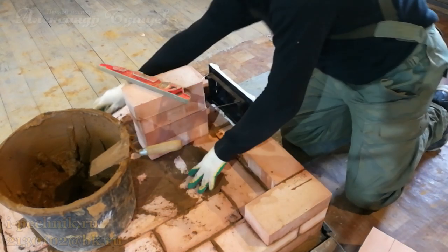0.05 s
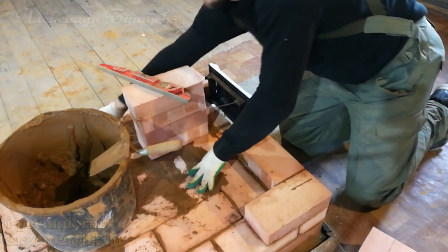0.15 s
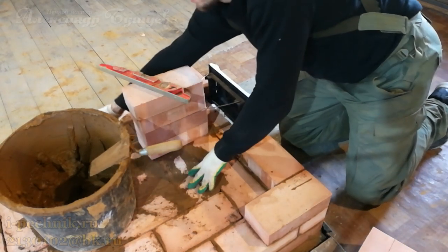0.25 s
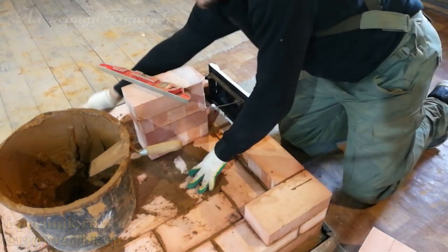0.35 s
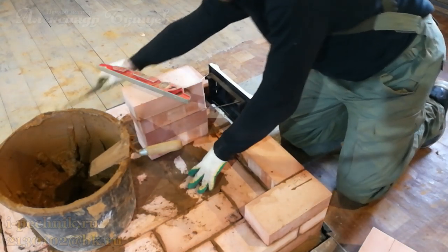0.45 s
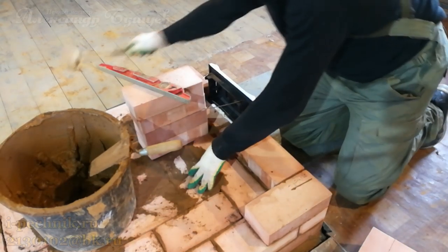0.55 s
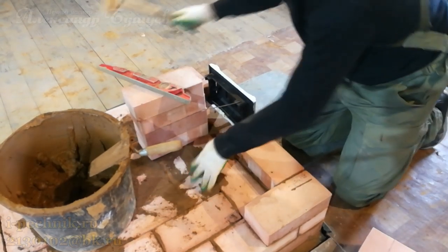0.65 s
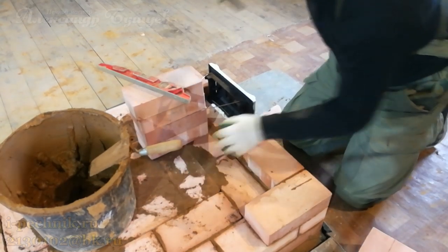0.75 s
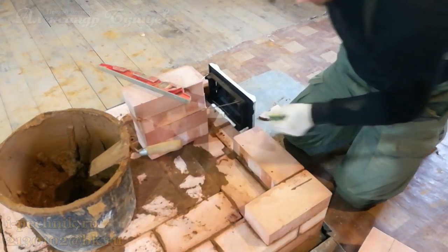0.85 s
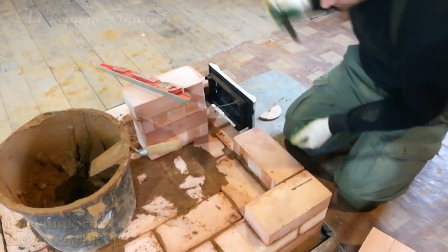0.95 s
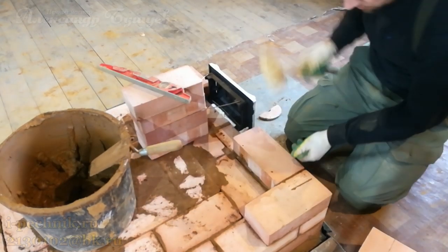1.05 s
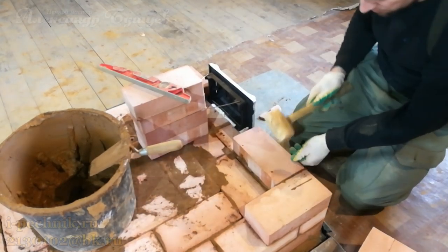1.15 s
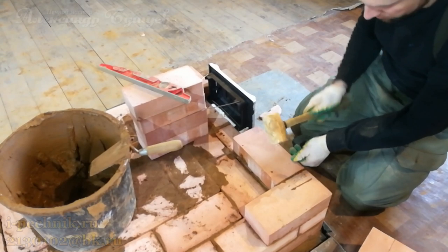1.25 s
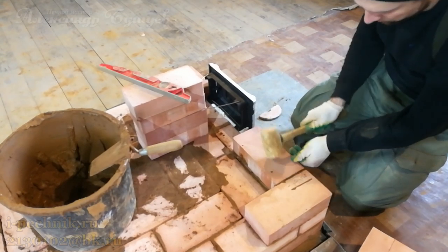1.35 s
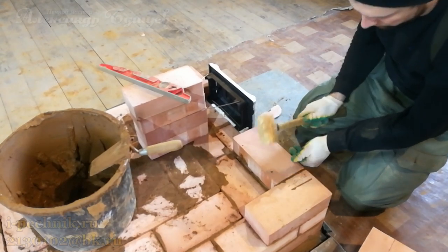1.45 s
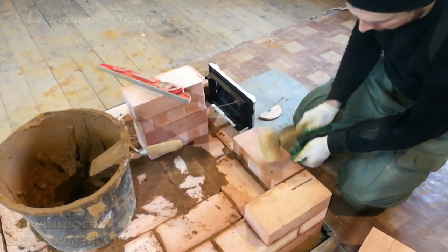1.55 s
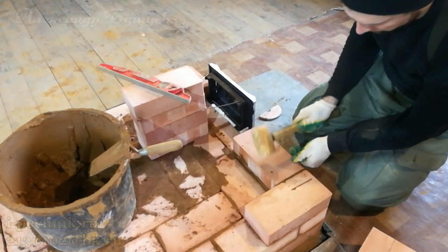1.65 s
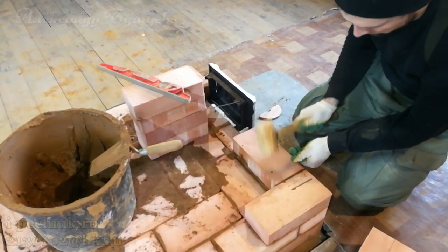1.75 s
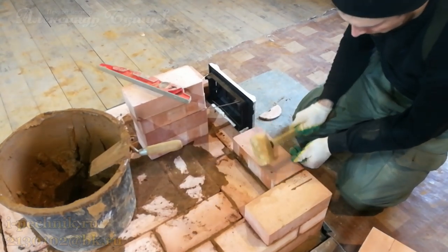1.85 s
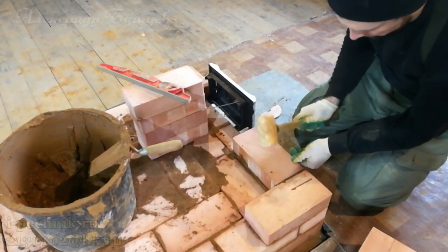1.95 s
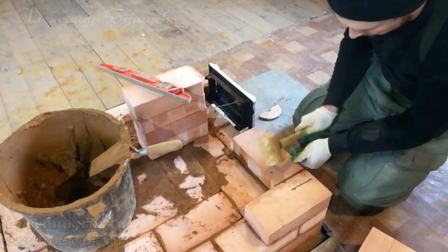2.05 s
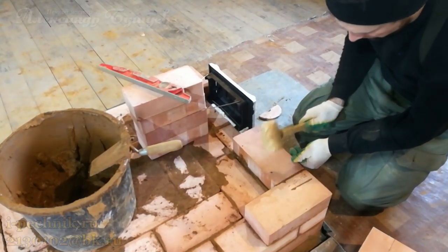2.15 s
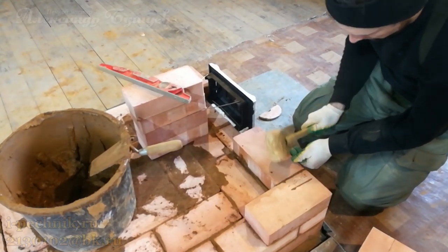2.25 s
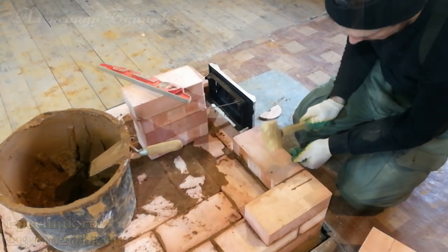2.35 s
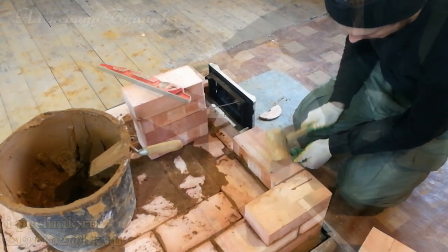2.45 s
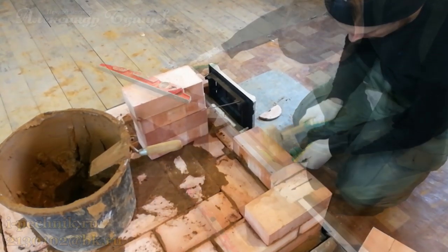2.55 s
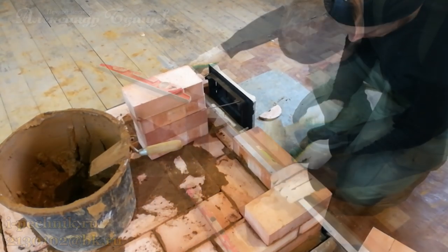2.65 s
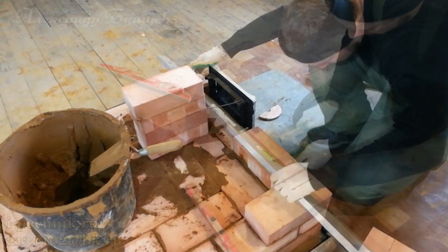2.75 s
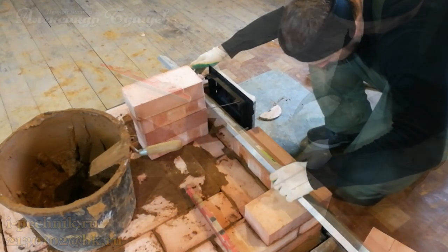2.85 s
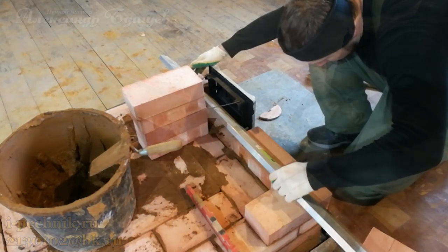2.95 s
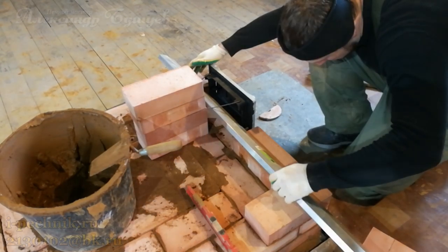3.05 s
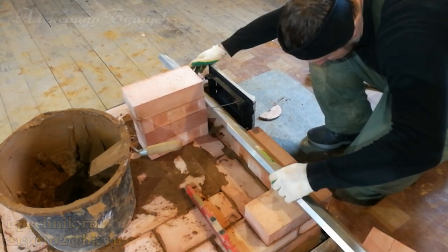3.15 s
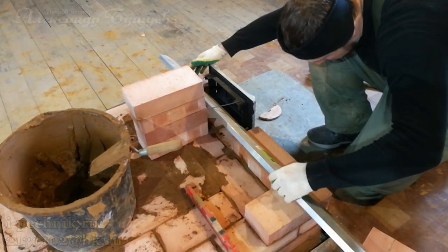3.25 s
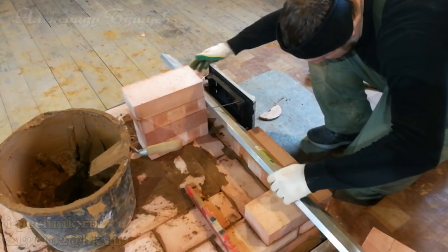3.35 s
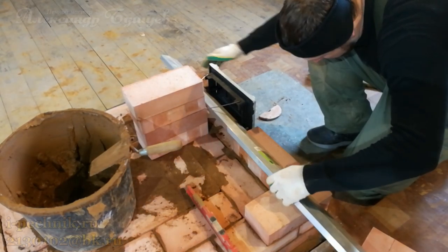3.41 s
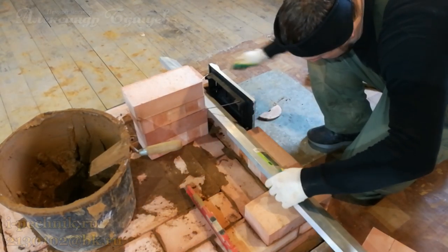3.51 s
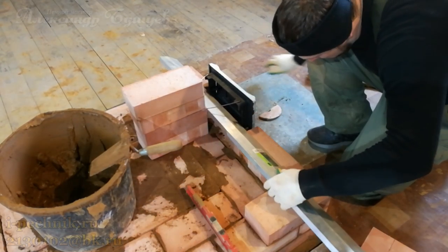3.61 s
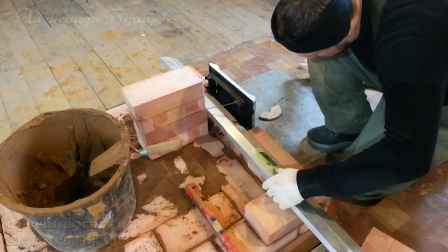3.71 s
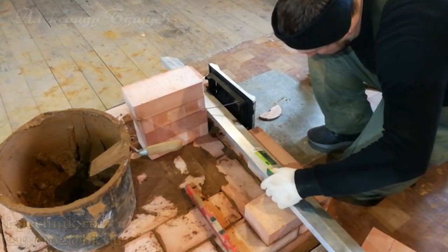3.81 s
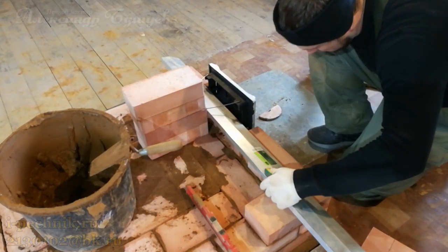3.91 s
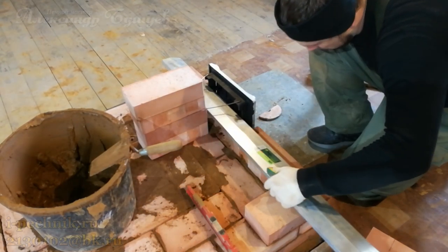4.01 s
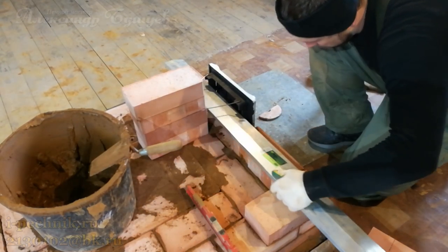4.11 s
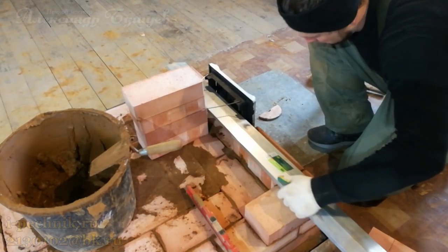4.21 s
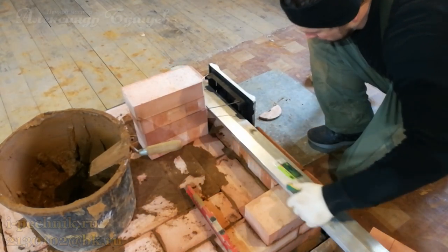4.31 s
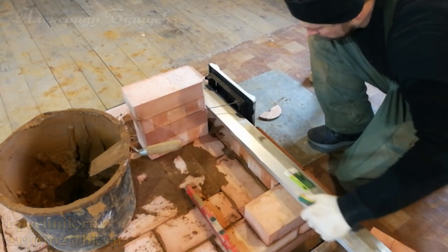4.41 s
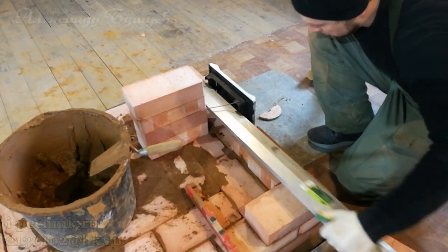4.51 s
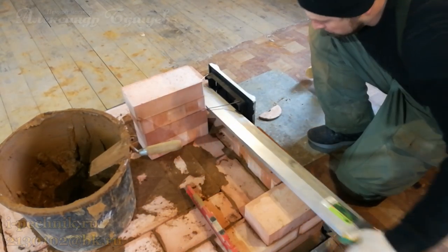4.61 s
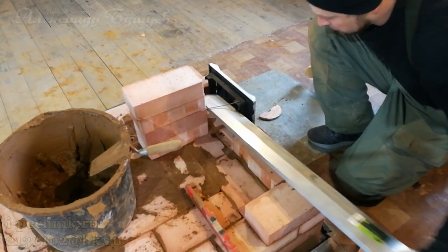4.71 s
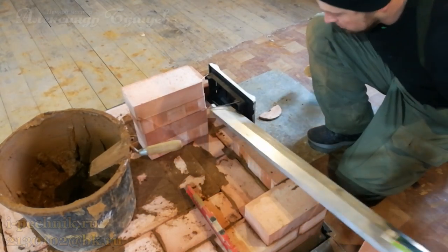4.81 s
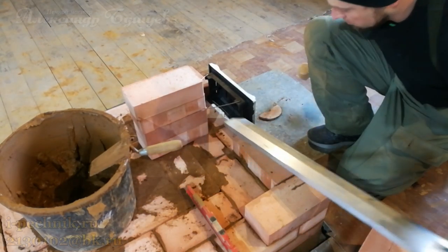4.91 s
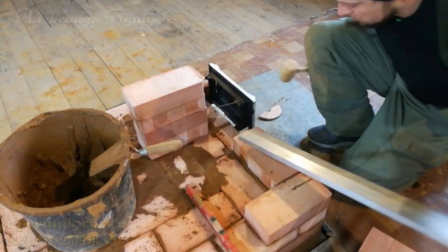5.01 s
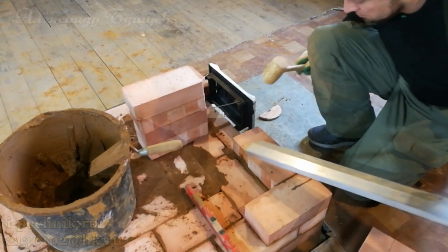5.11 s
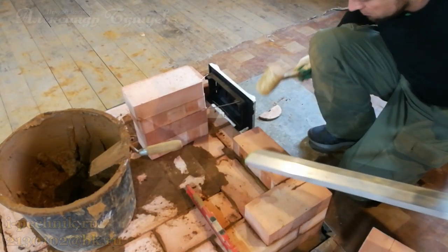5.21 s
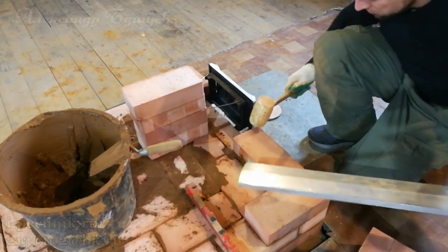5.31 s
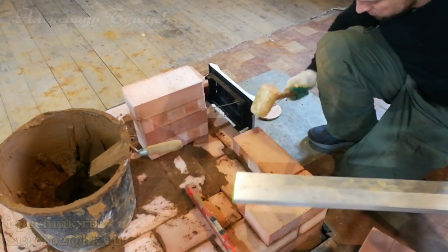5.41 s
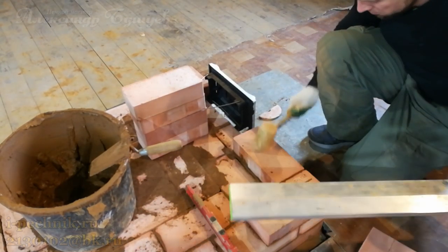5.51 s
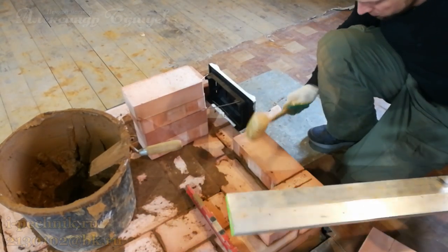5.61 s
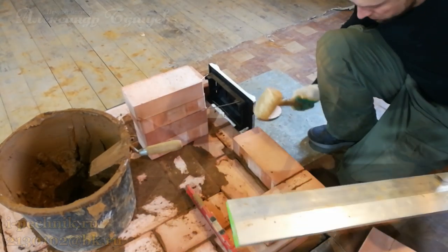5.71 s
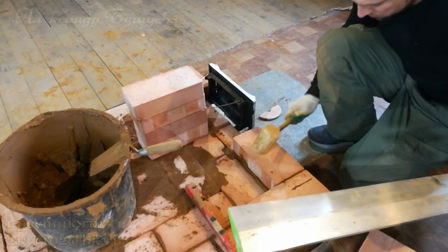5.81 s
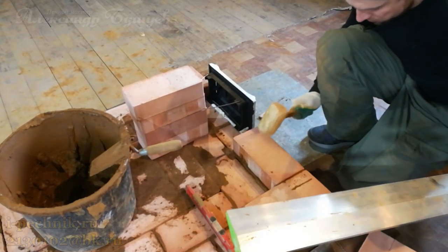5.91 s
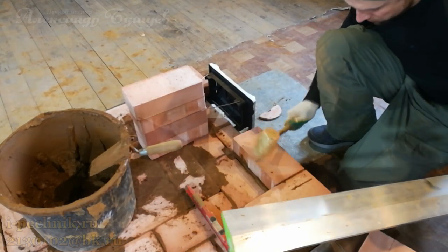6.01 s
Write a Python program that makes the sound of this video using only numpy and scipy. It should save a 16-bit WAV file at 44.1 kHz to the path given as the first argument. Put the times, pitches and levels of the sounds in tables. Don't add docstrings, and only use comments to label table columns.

```python
import sys
import numpy as np
from scipy import signal
from scipy.fft import rfft, irfft, next_fast_len
from scipy.io import wavfile
from scipy.ndimage import uniform_filter1d

SR = 44100
rng = np.random.default_rng(int(sys.argv[2]) if len(sys.argv) > 2 else 0)


def master_out(mix):
    frames = np.transpose(np.atleast_2d(mix))
    ceiling = np.clip(frames, -1, 1)
    pcm = np.round(ceiling * 32767).astype(np.int16)
    wavfile.write(sys.argv[1], SR, pcm)


def voltage_ratio(decibels):
    exponent = np.asarray(decibels, float) / 20
    return 10 ** exponent


N = 267543
TIME = np.arange(N) / SR

# mode_hz, level_db, t60_s
BAR_MODES = [(310, -5, .1), (495, -2, 0.12), (856, -2.5, 0.082), (1078, 3.5, 0.22), (1190, 0, 0.2),
             (1270, -1, 0.14), (1420, -5, 0.1), (1650, 1, 0.08), (1780, 7, 0.13), (1950, 0, 0.1),
             (2318, -8, 0.2), (2958, 4, 0.05), (3100, 2, 0.07), (3400, 1, 0.12), (3650, 0, 0.08),
             (4340, -5, 0.035), (5300, -3, 0.03)]
# freq_hz, density_db (per Hz)
GRIT_SPECTRUM = [(240, -41), (400, -13), (753, -19), (1060, -9), (1730, -1.5), (2290, -10.5), (3200, -6),
                 (4200, -10), (5300, -8), (7630, -12), (9700, -7.5), (16000, -13)]


def mallet():
    # start_s, crack_peak_db, thump_db, brightness_db
    blows = [(1.312, -38.5, -37, 10), (1.5256, -33, -34, 1), (1.7456, -31, -33.5, -8.5),
             (1.9764, -27.5, -32, 1.5), (2.2058, -33, -36, 0.5), (2.4159, -40.5, -37, 5),
             (2.6434, -37, -37.5, 4), (2.918, -44.5, -42.5, 7.5), (5.469, -22, -29.5, 8.5),
             (5.7289, -18, -30.5, -1), (5.978, -24.5, -32, 0)]
    # delay_s, level_db
    echoes = [(0, 3.5), (.007, -10.5), (0.009, -16), (0.0189, -4.5), (0.0223, -6.5), (0.03, -25.5),
              (0.03, -11), (0.04, -19.5), (.052, -16.5)]
    # mode_hz, level_db, t60_s
    board_modes = [(55.6, -10.5, 0.43), (76.8, 8, 0.16), (94.5, 1, 0.24), (107.3, 3, 0.2), (138, -1, 0.22),
                   (205.5, 5.5, 0.13), (264.6, -9, 0.13), (280, -14, 0.21), (383.5, -10, 0.14),
                   (665, -18, 0.14), (834, 0, 0.032)]
    # freq_hz, density_db (per Hz)
    crack_spectrum = [(290, -92), (500, -68), (708, -8), (960, 4), (1720, -4.5), (2290, -2.5), (4150, -9.5),
                      (4660, -9), (10800, -16), (16000, -25)]
    pulse_hz, pulse_peak_s = 270, .0028
    left_delay_s = np.array([[.00025], [0]])

    t = TIME[:SR // 2]
    thump = voltage_ratio(-4.0) * ring(board_modes, 0, 0.1, bloom=2.88)
    for delay, db in echoes:
        u = (np.pi * pulse_hz * (t - delay - pulse_peak_s - left_delay_s)) ** 2
        thump = thump + voltage_ratio(db) * (1 - 2 * u) * np.exp(-u)

    near, far, wet = np.zeros((2, N)), np.zeros(N), np.zeros(N)
    for s, crack_db, db, bright_db in blows:
        add(near, s, voltage_ratio(db + 6.5) * thump)
        add(wet, s, voltage_ratio(db - 7.5) * thump[0, :260])
        burst = crack(crack_db - 1.0, crack_spectrum, contact_s=0.0012)
        add(far, s, colour(burst, [(100, -33.5), (400, 26), (1000, -2.0), (15000, bright_db)]))
    return near, far, wet


def strikes():
    # start_s, ring_db, crunch_db, contact_s, clatter_t60_s,
    # ring_room_db (re ring_db), crunch_room_db (re crunch_db)
    knocks = [
        (3.491, -29, -18, 0.0081, 0.11, -17.5, -1),
        (4.079, -39.5, -27.5, 0.01, 0.0077, -19, 3),
        (4.619, -30, -5, 0.0032, 0.0087, -11, -8),
    ]
    # mode_hz, level_db, t60_s
    knock_modes = [(296, -10, .12), (345, -10, .1), (425, -9, .12), (460, -9, .12), (650, 4, .18),
                   (850, -8, .13), (1075, -8, .28), (1460, -3, .13), (1650, -4, .1), (1765, -1, .12),
                   (1950, -2, .22), (2180, -8, .13), (2600, -9, .07), (2923, -11, .12), (3408, -10, .11)]
    tap_modes = [(549, -22, .3), (1028, 0, .25), (1077, -1, .26), (1443, -14, .2), (2315, -12, .35),
                 (2900, -12, .15), (3359, -20, .15), (1300, -10, .1), (4393, -20, .12), (3100, -14, .1)]
    clink_modes = [(549, -22, .5), (640, -26, .15), (850, -16, .1), (1080, 6, .24), (1312, -1, .13),
                   (1652, -26, .64), (2318, -1.5, .31), (2996, -14, .28), (3300, -19, .17),
                   (3940, -15, .14), (6400, -4, .035), (9625, -15, .18), (9758, -7, .13), (10800, -16, .15)]
    # freq_hz, density_db (per Hz)
    knock_crunch = [(120, -46), (250, -4.5), (650, -5), (1200, -1.5), (1800, 0.5), (2600, -15.5),
                    (3500, -20.5), (4300, -29.5), (16000, -33.5)]
    tap_crunch = [(180, -18), (350, -11), (1000, -8), (1600, -5), (2100, -20.5), (3000, -10), (3800, -18.5),
                  (5400, -17), (7000, -22), (16000, -20)]
    clink_crunch = [(40, -20), (150, -20), (300, -29.5), (450, -31.5), (800, -5), (1400, -3.5), (3000, -4),
                    (4500, -5), (6500, 0.5), (8000, -9.5), (10000, 1.5), (14000, -8), (16000, -7)]

    near, far, wet, t = np.zeros((2, N)), np.zeros(N), np.zeros(N), TIME[:SR // 8]
    gate = np.clip((.4 - TIME[:SR // 2]) / 0.14, 0, 1)
    bodies = (knock_modes, knock_crunch), (tap_modes, tap_crunch), (clink_modes, clink_crunch)
    for (modes, crunch), knock in zip(bodies, knocks):
        s, db, crunch_db, contact_s, t60, room_db, walls_db = knock
        clatter = even(grit(len(t), 0.87) * fade(t, t60)) * fade(t, 4 * t60)
        bar = signal.fftconvolve(clatter, ring(modes, 0, 0.39) * gate, axes=1)
        bar = colour(bar, [(100, -30.5), (280, 3.5)])
        add(near, s, voltage_ratio(db) * bar)
        add(wet, s, voltage_ratio(db + room_db) * bar[0])
        burst = crack(crunch_db, crunch, contact_s)
        add(far, s, burst)
        add(wet, s, (voltage_ratio(walls_db) - 1) * burst)
    return near, far, wet


def rattles():
    # start_s, peak_db, hiss_db (re peak), loudest_hz, slide_t60_s, rise_s
    slips = [(2.294, -54, 2.5, 4400, 0.27, 0.0033), (2.335, -45.5, -8, 1320, 0.22, 0.0018),
             (2.49, -57.5, -1.5, 2970, .08, 0.0046), (2.533, -54.5, 4, 1450, 0.035, 0.0027),
             (2.581, -42.5, -1, 1230, 0.089, 0.0042), (2.671, -39, -20, 3230, 0.1, 0.0012),
             (2.797, -50.5, -32, 1140, 0.13, 0.0045), (2.83, -47.5, -16, 1790, .05, .004),
             (2.853, -50.5, 0, 1780, 0.047, 0.0056), (2.923, -31.5, -5.5, 1700, 0.018, 0.0088),
             (2.954, -39.5, 7, 1770, 0.025, .012), (3.041, -34.5, -44, 1140, 0.025, 0.01),
             (3.142, -38, -6, 1630, 0.14, 0.0053), (3.239, -45.5, -4, 493, 0.1, 0.0046),
             (3.27, -48.5, -7, 310, .05, 0.0068), (3.278, -33, -4, 1710, 0.048, 0.0038),
             (3.359, -38.5, -10.5, 504, 0.05, 0.0017), (3.471, -47.5, -16, 1280, 0.045, .012),
             (3.684, -37.5, -13, 810, 0.072, 0.0033), (3.729, -50, -3, 293, 0.047, 0.006),
             (4.002, -52, -11.5, 2318, 0.39, 0.012), (4.212, -42.5, -4, 1084, 0.038, 0.0021)]
    near, far, wet, t = np.zeros((2, N)), np.zeros(N), np.zeros(N), TIME[:SR // 4]
    for s, db, hiss_db, hz, t60, rise_s in slips:
        onset = np.clip(t / max(rise_s, .001), 0, 1)
        slip = grit(len(t), 2.38) * fade(np.maximum(t - rise_s, 0), t60) * onset
        modes = ring(BAR_MODES, 3, 0.9, most_t60=0.25, detune=.006)
        bar = signal.fftconvolve(slip, modes, axes=1)
        bar = band(bar, hz, 0.13) + voltage_ratio(-5.5) * colour(bar, [(150, -15.0), (400, -2.5)])
        bar = voltage_ratio(db - 0.5) * bar / np.max(np.abs(bar))
        add(near, s, bar)
        add(wet, s, voltage_ratio(-8.5) * bar[1])
        hiss = colour(colour(slip[0], GRIT_SPECTRUM), [(100, -41.5), (300, 6.5)])
        add(far, s, voltage_ratio(db + hiss_db + 12) * hiss / np.max(np.abs(hiss)))
    return near, far, wet


def drag():
    # peak_s, level_db, rise_s, fall_s
    pushes = [(2.62, -64.5, 0.25, 0.6), (2.78, -70.5, 0.091, 0.089), (2.84, -65, 0.026, 0.062),
              (2.92, -64.5, 0.025, .45), (3.485, -57, 0.03, 0.027), (3.52, -57, 0.072, .3),
              (3.8, -63, 0.18, .13), (4.23, -62.5, 0.28, 0.21), (4.33, -76, 0.09, 0.093)]
    push = swells(pushes)
    modes = ring(BAR_MODES, 0, 0.76, most_t60=0.0028)
    song = signal.fftconvolve(push * grit(N, 2.1), modes, axes=1)[:, :N]
    return rubbing(push, push * voltage_ratio(0.5), GRIT_SPECTRUM, spike_db=0.68) + voltage_ratio(-32.5) * song


def cloth():
    # peak_s, level_db, treble_db (re level), rise_s, fall_s
    strokes = [(0.0, -60, 8.5, 0.016, 0.16), (0.137, -56.5, -15, 0.11, 0.092),
               (0.191, -57.5, -14, 0.031, 0.097), (0.332, -66.5, 6.5, 0.62, 0.38),
               (0.58, -64, 5, 0.2, 0.083), (0.616, -61.5, 2.5, 0.041, 0.058),
               (0.731, -70, 13, 0.096, 0.033), (0.83, -71, 10.5, 0.42, 0.83),
               (0.975, -67.5, 14, 0.029, 0.21), (1.085, -58, -2, 0.071, 0.29),
               (1.29, -58, -10, 0.099, 0.42), (1.385, -63, 8, 0.059, 0.12), (1.446, -55, -2, 0.13, 0.077)]
    # freq_hz, density_db (per Hz)
    fabric = [(120, -40.5), (200, -17.5), (283, -5), (465, -9.5), (1500, -4), (2650, -3), (4500, -3),
              (7500, -6), (10000, -2.5), (15600, -4), (16200, -57.5)]
    gain = swells([(s, db, rise, fall) for s, db, _, rise, fall in strokes])
    treble = swells([(s, db + top_db, rise, fall) for s, db, top_db, rise, fall in strokes])
    return brief_dip() * rubbing(gain, treble, fabric, spike_db=1.7)


def snaps():
    # start_s, peak_db, centre_hz
    releases = [(0.1, -47.5, 2000), (0.125, -43.5, 2780), (0.184, -35, 1900), (0.235, -50, 2050),
                (0.334, -51, 2000), (0.548, -53, 2410), (0.578, -54, 2570), (0.617, -43.5, 2450),
                (0.729, -43.5, 2150), (0.974, -31, 8240), (1.065, -44.5, 2000), (5.31, -63.5, 9000)]
    # start_s, peak_db
    ticks = [(0.169, -40.5), (0.2841, -54), (0.548, -45.5), (0.5637, -44), (0.5785, -36.5), (0.837, -39),
             (0.858, -44.5), (0.95, -38.5), (0.9573, -41), (0.975, -37.5), (0.984, -43), (1.026, -34),
             (1.045, -38), (1.0636, -34), (1.655, -46.5)]
    far, t = np.zeros(N), TIME[:1024]
    for s, db, hz in releases:
        push = fade(t, 0.022) * np.clip(t / 0.0027, 0, 1)
        snap = band(grit(len(t), 6.2)[0] * push, hz, 0.22)
        add(far, s, voltage_ratio(db - 5.5) * snap / np.max(np.abs(snap)))
    for s, db in ticks:
        tick = band(grit(len(t), 0.84)[0] * fade(t, 0.0091), 11000, 0.5)
        add(far, s, voltage_ratio(db - 5.0) * tick / np.max(np.abs(tick)))
    return far


def swishes():
    # peak_s, level_db, centre_hz, rise_s, fall_s
    whips = [
        (5.01, -73, 2410, 0.037, 0.064),
        (5.106, -64.5, 2926, 0.06, 0.11),
        (5.656, -68.5, 1448, 0.19, 0.035),
        (5.713, -63.5, 1806, 0.099, 0.012),
    ]
    climb_per_s, hiss_db = 9, -1
    slow = band(rng.standard_normal((2, N)), 327, 1.64)
    hiss = band(rng.standard_normal((2, N)), 10000, 0.45)
    out = 0
    for s, db, hz, rise, fall in whips:
        centre = hz * np.exp(climb_per_s * np.clip(TIME - s, -.1, .035))
        carrier = np.cos(2 * np.pi * np.cumsum(centre) / SR)
        whip = level(slow * carrier, 1.8) + level(hiss, hiss_db)
        out = out + swell(s, db, rise, fall) * whip
    return colour(out, [(900, 0), (1500, 4), (1780, 6), (2100, 2.0)])


def boards():
    # peak_s, level_db, rise_s, fall_s
    creaks = [(0.07, -59, .4, 0.35), (0.4, -64.5, 0.12, 0.044), (0.56, -69, 0.051, 0.95),
              (1.29, -78, 0.22, 0.022)]
    weights = [(0.15, -69, 0.34, 0.82), (0.585, -54, 0.077, 0.11), (0.74, -66.5, 0.092, 0.25)]
    rumbles = [(0.1, -71.5, 0.47, 0.37), (0.44, -63, 0.17, 0.1), (0.585, -86, 0.12, 0.044),
               (1.1, -66.5, 0.23, 0.43), (1.29, -61, 0.15, 0.082), (3.73, -59, 0.1, 0.15)]
    shuffles = [(3.36, -75.5, 0.12, 0.17), (3.74, -67.5, 0.067, 0.086), (4.02, -61, 0.13, 0.39),
                (4.44, -80.5, 0.13, 0.18)]
    # peak_s, hum_db, overtone_db (re hum), fall_s
    nudges = [
        (4.887, -67.5, -2, 0.082),
        (4.928, -62, -14, 0.041),
        (4.97, -71, -6.5, 0.064),
        (5.03, -68, -23, 0.046),
    ]
    bucket_hz = 162, 363
    nudge_rise_s, buzz_db = 0.04, -5

    def hum(hz, octaves):
        return level(band(rng.standard_normal(N), hz, octaves), 0)

    knees = swells(creaks) * hum(94.3, 0.027)
    knees = knees + swells(weights) * hum(21, 0.77)
    knees = knees + swells(rumbles) * hum(120, 1.0)
    low, high = (np.sqrt(2) * np.sin(2 * np.pi * hz * TIME) + voltage_ratio(buzz_db) * hum(hz, 0.27)
                 for hz in bucket_hz)
    bucket = 0
    for s, db, top_db, fall in nudges:
        bucket = bucket + swell(s, db, nudge_rise_s, fall) * (low + voltage_ratio(top_db) * high)
    return brief_dip() * knees + swells(shuffles) * hum(120, 0.73) + bucket


def room(x):
    # centre_hz, t60_s, level_db, likeness (left-right)
    tail_bands = [(70, .3, -15, 0.77), (136, 1, 8.5, 1), (550, 0.38, 2.5, 0.13), (232.4, 0.22, -2.5, 0.24),
                  (980, 0.17, 2.5, 0.12), (2000, 0.2, 0, 0.039), (3840, 0.36, 3.5, 0.1),
                  (7300, 0.13, 1.5, 0.05), (14660, 0.36, 2.5, .02)]
    first_wall_s = .0072
    t, tail = TIME[:SR // 2], 0
    for hz, t60, db, like in tail_bands:
        build = np.clip((t - first_wall_s) * hz / 0.28, 0, 1)
        mid, side = band(rng.standard_normal((2, len(t))), hz, 0.79) * fade(t, t60) * build
        like = np.clip(like, 0, 1)
        pair = np.sqrt(1 + like) * mid + np.sqrt(1 - like) * side * np.array([[1], [-1]])
        tail = tail + voltage_ratio(db) * pair / np.sqrt(t60 * SR / 12)
    gate = np.clip((.24 - t) / .11, 0, 1)
    return signal.fftconvolve(x[None], tail * gate, axes=1)[:, :N]


def air():
    # freq_hz, density_db (per Hz)
    floor = [(15, -9.5), (40, 4.5), (120, -4), (250, -11), (500, -16.5), (1600, -16), (3000, -19.5),
             (8000, -23), (15500, -19.5), (16500, -55)]
    mid, side = colour(rng.standard_normal((2, N)), floor)
    side = colour(side, [(60, -16.0), (400, -0.5)])
    return level(mid + side * np.array([[1], [-1]]), -68.5)


def ring(modes, scatter_db, spread, most_t60=0.64, detune=0., bloom=0.13):
    hz, db, t60 = np.transpose(modes)[:, :, None]
    t, chance = TIME[:SR // 2], rng.standard_normal((4, len(modes), 1))
    build = (1 - np.exp(-t * hz / bloom)) ** 2
    body = voltage_ratio(db + scatter_db * chance[0]) * fade(t, np.minimum(t60, most_t60)) * build
    turn = 2 * np.pi * hz * (1 + detune * chance[3]) * t
    return np.array([np.sum(body * np.sin(turn + spread * c), axis=0) for c in chance[1:3]])


def crack(db, points, contact_s):
    t = TIME[:4096]
    push = t / contact_s * np.exp(1 - t / contact_s) * fade(t, 9 * contact_s)
    burst = even(grit(len(t), 3.3)[0] * push) * np.sqrt(push)
    shaped = colour(burst, points)
    return shaped * voltage_ratio(db) / np.max(np.abs(shaped))


def rubbing(gain, treble_gain, points, spike_db):
    noise = level(colour(grit(N, spike_db, channels=2), points), 0)
    low = colour(noise, [(2500, -3), (9000, -18.5)])
    treble = treble_gain * flicker(27.0, 0.47) * level(noise - low, 0)
    return gain * flicker(13, 4.1) * level(low, 1.0) + treble


def grit(size, spike_db, channels=1):
    grains = rng.standard_normal((channels, size))
    return level(grains * voltage_ratio(spike_db * rng.exponential(size=size)), 0)


def flicker(rate_hz, db):
    k = int(SR / rate_hz)
    steps = np.repeat(rng.standard_normal(N // k + 1), k)
    return voltage_ratio(db * uniform_filter1d(steps, k)[:N])


def swell(s, db, rise_s, fall_s):
    rounding = 1.72
    away = np.maximum((s - TIME) / max(rise_s, .003), (TIME - s) / max(fall_s, .003))
    return voltage_ratio(np.maximum(db - 20 * away ** rounding, -200))


def swells(rows):
    return np.sqrt(sum(swell(*row) ** 2 for row in rows))


def brief_dip():
    dip_s = .46, .51, .535, .55
    dip_db = -13.5
    return voltage_ratio(np.interp(TIME, dip_s, [0, dip_db, dip_db, 0]))


def fade(t, t60):
    return np.exp(-np.log(1000) * t / np.maximum(t60, .002))


def level(x, db):
    return x * voltage_ratio(db) / np.sqrt(np.mean(x ** 2))


def shape(x, gain):
    size = next_fast_len(x.shape[-1] + 2048)
    return irfft(rfft(x, size) * gain(np.fft.rfftfreq(size, 1 / SR) + 1), size)[..., :x.shape[-1]]


def colour(x, points):
    hz, db = np.transpose(points)
    return shape(x, lambda f: voltage_ratio(np.interp(np.log(f), np.log(hz), db)))


def band(x, hz, octaves):
    return shape(x, lambda f: np.exp(-.5 * (np.log2(f / hz) / octaves) ** 2))


def even(x):
    bins = rfft(x)
    return irfft(bins / np.abs(bins))


def add(out, s, x):
    i = int(s * SR)
    out[..., i:i + x.shape[-1]] += x[..., :out.shape[-1] - i]


def late(pair, count):
    bass = shape(pair[0], lambda f: 1 / (1 + (f / 760) ** 6))
    return np.array([pair[0] - bass + np.roll(bass, count), pair[1]])


def hush(x):
    depth_db, knee_db, width_db = -11, 11, 2
    bins = signal.stft(x, nperseg=512)[2]
    power = np.mean(np.abs(bins) ** 2, axis=0)
    power = uniform_filter1d(uniform_filter1d(power, size=12, axis=0), size=4, axis=1)
    over_db = 10 * np.log10(power / np.percentile(power, 8, axis=1, keepdims=True))
    shut = .5 - .5 * np.tanh((over_db - knee_db) / max(width_db, 1) / 2)
    return signal.istft(bins * voltage_ratio(depth_db * shut), nperseg=512)[1][:, :N]


def scene():
    # time_s, pan_db (left minus right)
    places = [(0, 2), (3.4, 0), (4.0, -2), (4.5, 3.5), (4.6, -3), (4.95, -9.5), (5.3, 1), (6.1, 1.3)]
    floor_echo_s, floor_echo_db = .0022, -17
    brick_echo_s, brick_echo_db = .0045, -18
    left_lag, room_lag = 18, 20

    blows, knocks, slips = mallet(), strikes(), rattles()
    near = blows[0] + late(knocks[0] + slips[0], count=left_lag)
    far = blows[1] + knocks[1] + slips[1] + snaps()
    wet = blows[2] + knocks[2] + slips[2]
    far = far + voltage_ratio(floor_echo_db) * np.roll(far, int(floor_echo_s * SR)) \
        + voltage_ratio(brick_echo_db) * np.roll(far, int(brick_echo_s * SR))
    treble = band(np.roll(far, 9), 8000, 1.0) * np.array([[1], [-1]])
    direct = voltage_ratio(0.5) * far + voltage_ratio(-4.5) * treble
    pan_db = np.interp(TIME, *np.transpose(places))
    work = near + late(direct, count=left_lag) + late(room(far + wet), count=room_lag)
    work = work * voltage_ratio(np.array([pan_db, -pan_db]) / 2)
    return work + cloth() + drag() + swishes() + boards() + air()


def band_limit(x):
    return signal.sosfilt(signal.butter(12, 16820, fs=SR, output="sos"), x)


def record(dry):
    top = signal.ellip(8, .2, 70, 16050, fs=SR, output="sos")
    return band_limit(signal.sosfilt(top, hush(dry)))


dry = scene()
out = record(dry)
master_out(out)
```